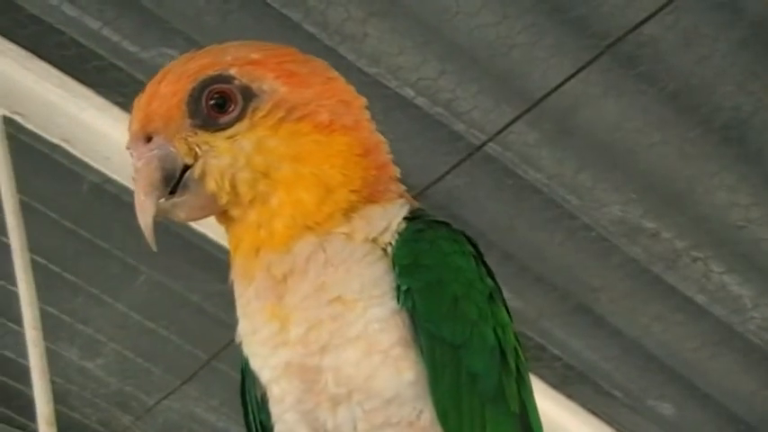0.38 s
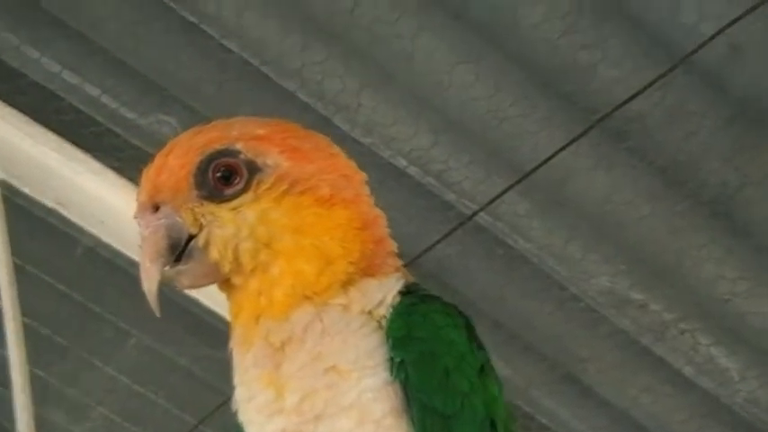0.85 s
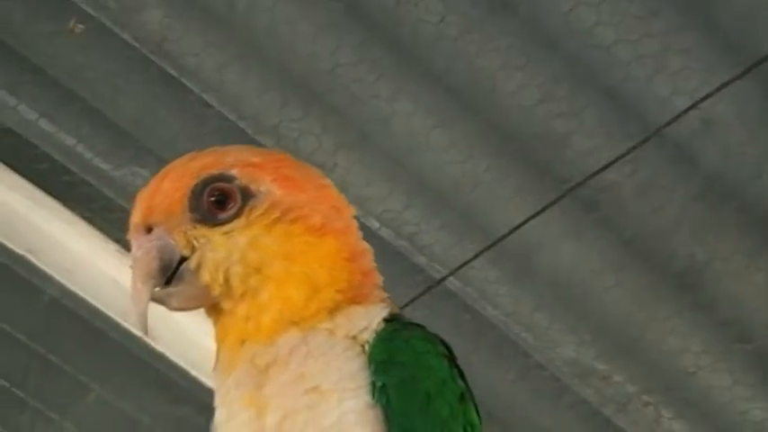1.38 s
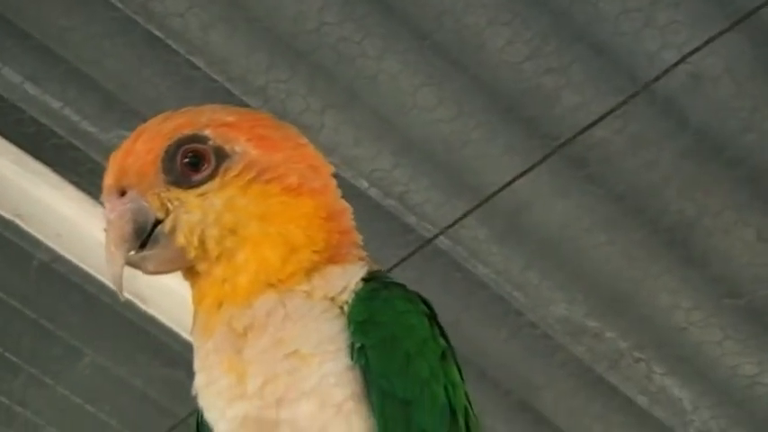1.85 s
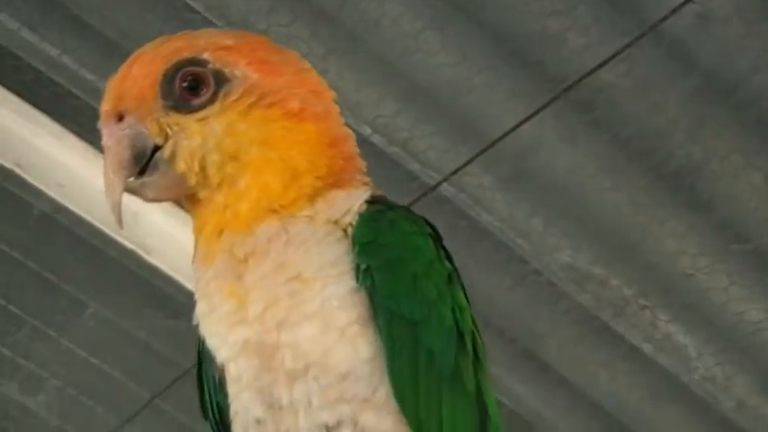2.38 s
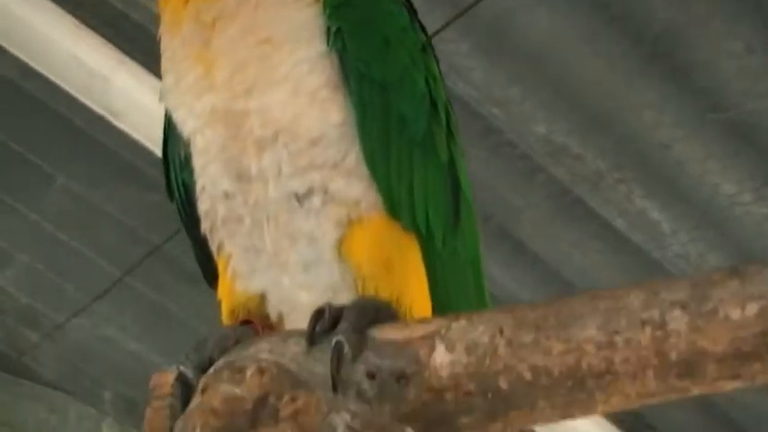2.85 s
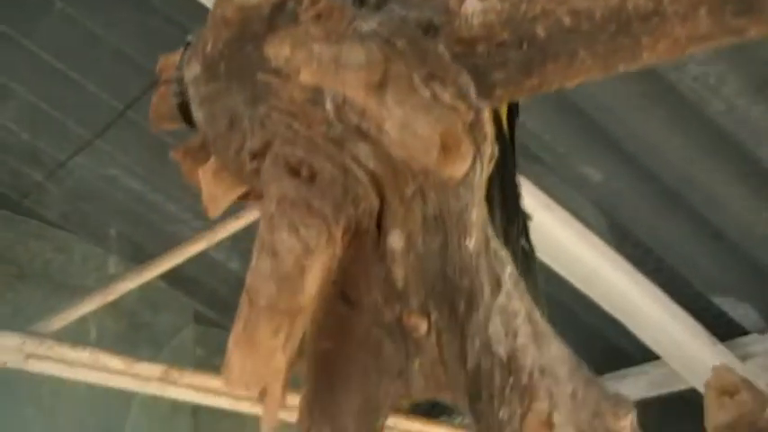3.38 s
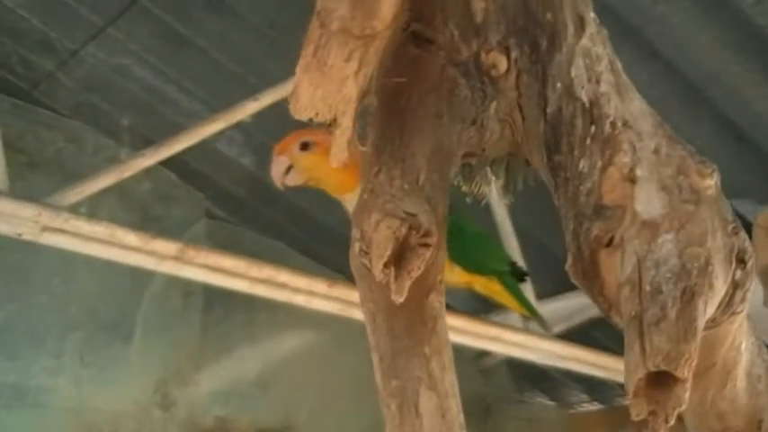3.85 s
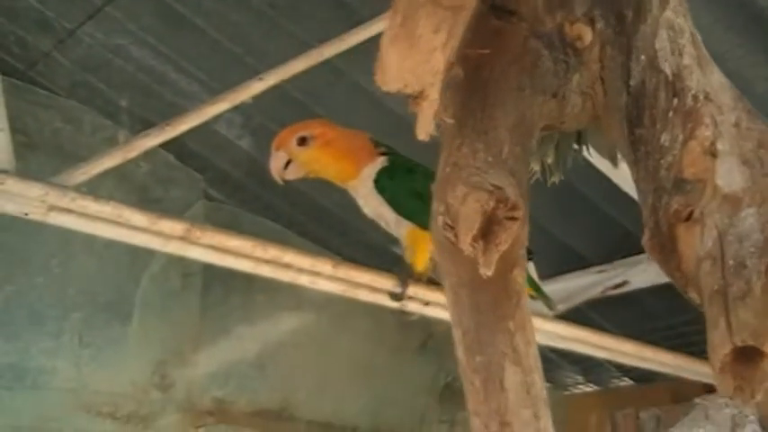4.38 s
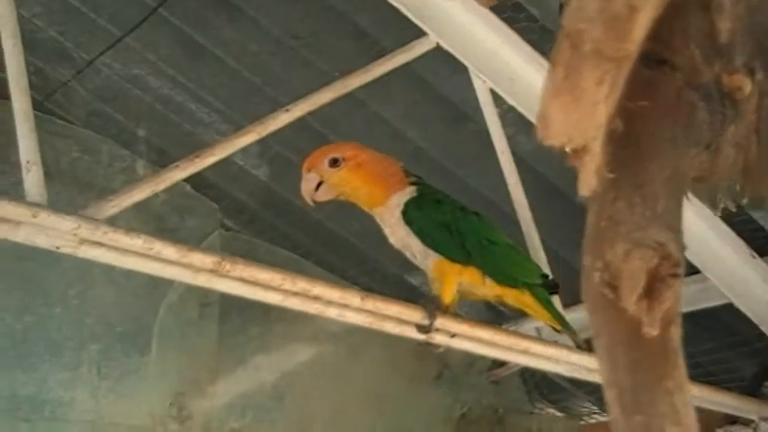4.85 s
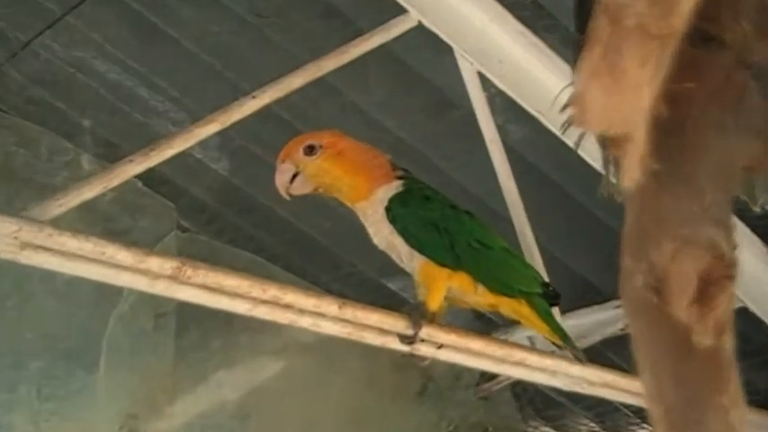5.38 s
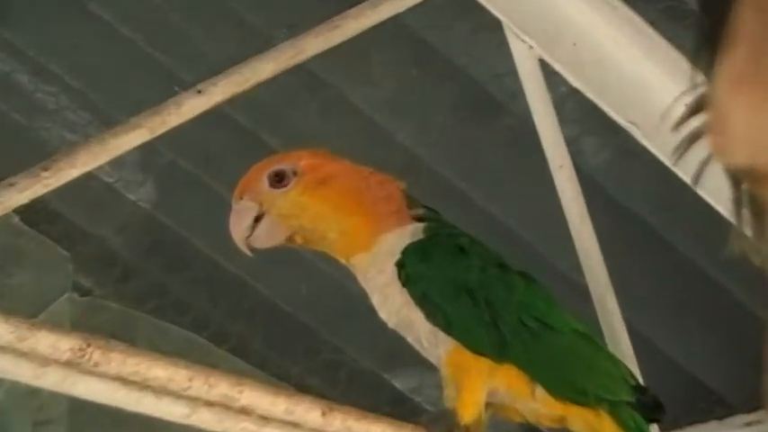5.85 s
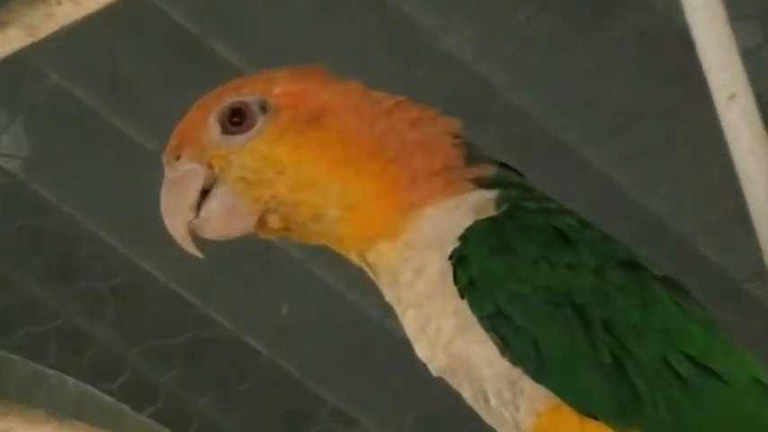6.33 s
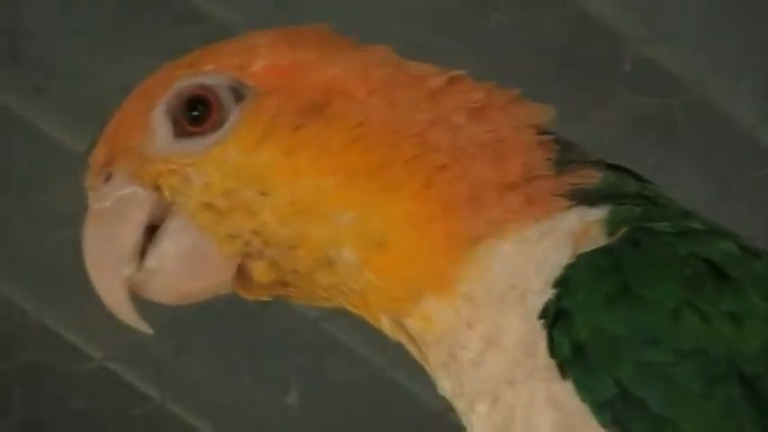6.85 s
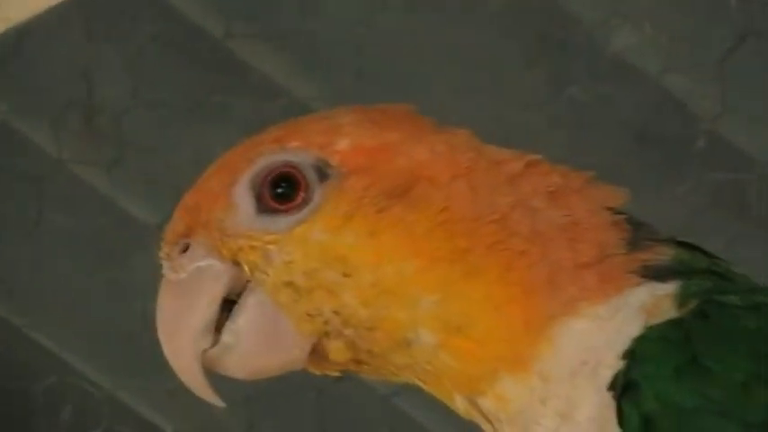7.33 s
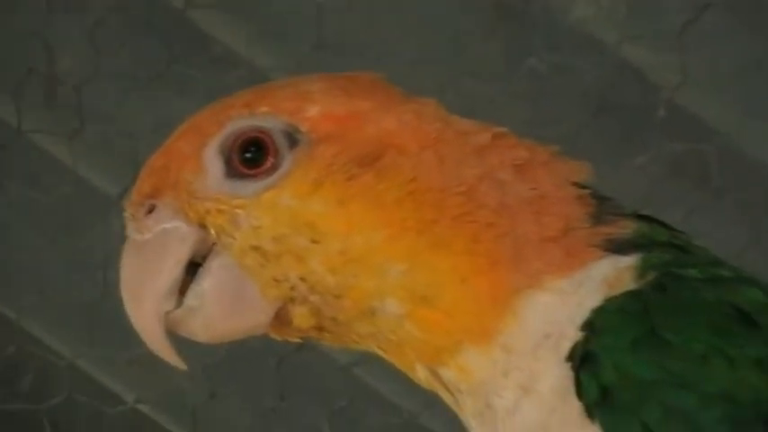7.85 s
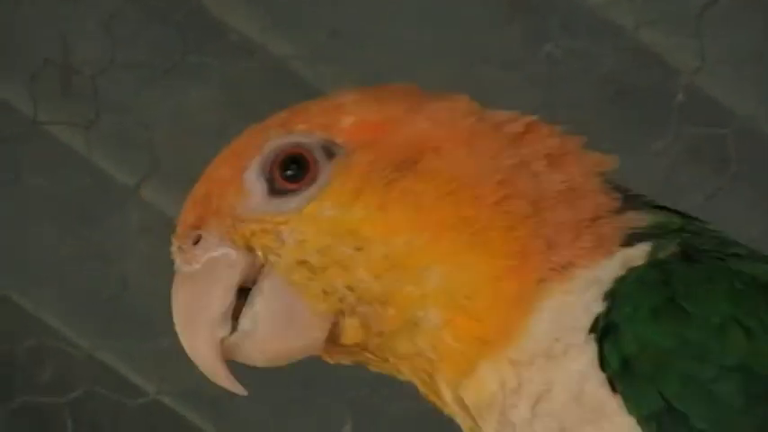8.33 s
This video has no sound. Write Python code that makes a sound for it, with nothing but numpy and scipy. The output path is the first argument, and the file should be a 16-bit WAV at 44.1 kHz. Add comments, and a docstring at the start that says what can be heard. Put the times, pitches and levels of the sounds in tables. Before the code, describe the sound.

Several parrots call at varying distances under a hard roof, recorded fairly close with a slight stereo spread. Short rough squawks and chirps alternate with needle-thin whistles while feathers rustle and something stirs low down. After a sharp woody knock comes one half-second grating screech, the loudest event, ringing off the roof. A pair of strong nasal calls answers, then only sparse quiet notes, rustles and low rumble remain.

```python
"""First heard are low stirring and soft rustling above a distant rumble, then a faint pitched note.
The place is a roofed aviary: parrots give notes, harsh squawks and thin whistles, all shaken harmonic stacks
through throat colours; a closer bird gives a long rattling screech, bursts of airflow over a strained tone.
The hard roof answers with sparse decaying echoes; dull knocks, short damped rings, sit near the microphone.
Rumble, hum, stirring and rustles are coloured noise, and a faint buzz is two sines."""
import sys
import numpy as np
from scipy import signal
from scipy.fft import rfft, irfft
from scipy.io import wavfile
from scipy.ndimage import uniform_filter1d

SR = 44100
rng = np.random.default_rng(int(sys.argv[2]) if len(sys.argv) > 2 else 0)


def transcribe(u):
    """Save the signal u as a 16-bit wav file named by the first command-line argument.

    u: samples, shape (n,) or (channels, n), limited to [-1, 1]; the rate is SR.
    q: integer samples, one column per channel.
    """
    v = np.clip(np.atleast_2d(u).T, -1, 1)
    q = np.round(v * 32767).astype(np.int16)
    wavfile.write(sys.argv[1], SR, q)


def rack_gain(trim_db):
    """Turn a fader trim in dB into the linear factor to multiply a signal by."""
    fader = np.asarray(trim_db, float)
    return 10 ** (fader / 20)


N = 373527
FRAMES = N // 256 + 5  # spectral frames of the patchy noises, 256 samples apart


def evened(x):
    """Scale to an rms of 1."""
    return x / np.sqrt(np.mean(x ** 2) + 1e-20)


def read(points, hz):
    """Value of a (frequency, value) curve, interpolated along log frequency."""
    f, value = np.transpose(points)
    return np.interp(np.log(hz + 1), np.log(f + 1), value)


def coloured(x, points):
    """Filter by a curve of (frequency [Hz], gain [dB])."""
    hz = np.fft.rfftfreq(x.shape[-1], 1 / SR)
    return irfft(rfft(x) * rack_gain(read(points, hz)), x.shape[-1])


def drift(count, seconds):
    """Smooth chance of rms 1: noise averaged twice over a window of the given length."""
    size = max(round(seconds * SR), 2)
    chance = rng.standard_normal((count // 2 ** 14 + 1) * 2 ** 14)[:count]
    return evened(uniform_filter1d(uniform_filter1d(chance, size), size))


def add(mix, s, sound):
    """Lay a sound into the mix from time s, cut at the end."""
    part = mix[round(s * SR):][:len(sound)]
    part += sound[:len(part)]


def unrolled(rows):
    """Start time and each column at the sample rate."""
    s, *columns = np.transpose(rows)
    t = np.arange(s[0], s[-1], 1 / SR)
    return s[0], [np.interp(t, s, c) for c in columns]


def span(length):
    """Progress 0-1 through a call."""
    return np.linspace(0, 1, round(length * SR))


def arch_db(u):
    """Level of a note or whistle: up to its peak, then fading."""
    return np.interp(u, [0, 0.44, 1], [-7.5, 0, -6])


# distant rumble, spectrum: (frequency [Hz], relative level [dB])
RUMBLE_COLOUR = [(20, -10), (50, -9), (150, -1), (400, 8), (1200, 1.5), (2500, -3), (7000, -10),
                 (9500, -21), (15600, -37)]


def rumble():
    """Distant steady rumble: coloured noise, unrelated in mid and side."""
    noise = rng.standard_normal((2, N + N % 2))
    return rack_gain(-51) * evened(coloured(noise, RUMBLE_COLOUR))[:, :N]


# faint mains buzz, fundamental then octave: (rms level before its waver [dB])
BUZZ_LEVELS = [-66.5, -70]


def mains_buzz():
    """A sine at 100 Hz and its octave, each coming and going by itself."""
    t, buzz = np.arange(N) / SR, np.zeros(N)
    for k, db in enumerate(BUZZ_LEVELS, start=1):
        level = rack_gain(db + 3 * drift(N, .25))
        buzz += level * np.sqrt(2) * np.sin(2 * np.pi * k * 100 * t)
    return buzz


def patchy_noise(shape, patchy_db, patches):
    """Mid and side noise of a given spectrum, made uneven over time and frequency by the patches."""
    hz = np.fft.rfftfreq(1024, 1 / SR)
    real, imaginary = rng.standard_normal((2, 2, FRAMES, 513)).transpose(0, 1, 3, 2)
    z = (real + 1j * imaginary) * rack_gain(read(shape, hz)[:, None] + patchy_db * patches)
    return evened(signal.istft(z, nperseg=1024, noverlap=768)[1][:, :N])


# dull hum, spectrum: (frequency [Hz], relative level [dB])
HUM_COLOUR = [(20, -37), (60, -6.5), (100, 2.5), (150, -16), (205, -1), (260, -4), (400, -62)]


def dull_hum(patches):
    """Low-pitched noise whose level wavers slightly."""
    return rack_gain(-56 + .8 * drift(N, .15)) * patchy_noise(HUM_COLOUR, 1.2, patches)


# low stirring, spectrum: (frequency [Hz], relative level [dB])
STIR_COLOUR = [(71, -43), (120, -14.5), (288, -4.5), (420, -6.5), (550, -6.5), (673, -8.5), (905, -7.5),
               (3000, -21), (3900, -46), (6600, -120)]
# low stirring, course: (time [s], level [dB])
STIR_LEVEL = [(0, -47.5), (.5, -46.5), (.85, -40.5), (1.25, -45), (1.4, -38), (1.8, -44.5), (2.1, -42.5),
              (2.4, -46.5), (2.55, -41.5), (3.1, -43.5), (3.6, -49.5), (3.85, -48), (4.1, -50.5),
              (5.2, -50), (5.42, -44.5), (5.7, -52.5), (7.15, -51.5), (7.6, -46.5), (8.2, -48.5),
              (8.47, -57.5)]


def low_stirring(patches):
    """Low noise that swells and sinks along its level course."""
    level = rack_gain(np.interp(np.arange(N) / SR, *np.transpose(STIR_LEVEL)))
    return level * patchy_noise(STIR_COLOUR, 1.5, patches)


# feathers and leaves, spectrum: (frequency [Hz], relative level [dB])
RUSTLE_COLOUR = [(400, -24), (1500, -3), (2300, -9), (3500, -7.5), (4600, -10.5), (7500, -7.5), (9300, -19),
                 (15600, -46)]
# single rustles: (start [s], level [dB], decay time t60 [s])
RUSTLE_EVENTS = [(0, -50.5, 1.9), (.6, -39.5, 2.2), (.9, -46.5, 1.8), (1.29, -41, 4.7), (1.95, -42, 2.2),
                 (2.35, -43.5, 1.6), (2.5, -41.5, 1.4), (2.95, -49, 4.2), (3.75, -47, 2.2), (4.2, -49, 2.2),
                 (4.8, -51, 3), (5.05, -44.5, 1.2), (5.5, -40, 2.7), (6.92, -43, 1.1), (7.38, -40.5, 4.1),
                 (7.62, -46, 0.94), (7.9, -49, 5)]


def rustles(patches):
    """Wings and leaves: noise under quickly rising, slowly decaying envelopes that add in power."""
    t, power, rise_s = np.arange(N) / SR, np.zeros(N), 0.038
    for s, db, t60 in RUSTLE_EVENTS:
        rise = np.clip((t - s) / rise_s, 0, 1)
        power += (rise * rack_gain(db - 60 * np.maximum(t - s, 0) / t60)) ** 2
    return np.sqrt(power) * patchy_noise(RUSTLE_COLOUR, 1.5, patches)


def background():
    """Rumble, buzz, hum, stirring and rustles; the noises are unrelated in mid and side."""
    patches = rng.standard_normal((FRAMES, 513))
    patches = uniform_filter1d(uniform_filter1d(patches, 8, axis=0), 20, axis=1)
    patches = evened(patches).T
    out = rumble()
    out[0] += mains_buzz()  # mid only
    return out + dull_hum(patches) + low_stirring(patches) + rustles(patches)


# answer of the hard roof: (frequency [Hz], decay time t60 [s])
ROOF_DECAY = [(700, 0.076), (1400, 0.5), (2200, 0.45), (4000, 0.52), (7000, 0.41), (12000, 0.29)]


def roof(x):
    """Mid and side echoes: sparse taps of random sign, each band dying at its own speed."""
    taps = np.zeros((2, SR))
    at = np.arange(200, SR - 20, 20) + rng.integers(0, 20, (2, (SR - 201) // 20))
    np.put_along_axis(taps, at, rng.choice([-1., 1.], at.shape), 1)
    hz, t, z = signal.stft(taps, SR, nperseg=256)
    decay = rack_gain(-60 * t / read(ROOF_DECAY, hz)[:, None])
    tail = signal.istft(z * decay, SR, nperseg=256)[1]
    return signal.fftconvolve(x[None], tail / np.linalg.norm(tail[0]), axes=1)[:, :N]


# dull knocks near the microphone: (time [s], level [dB], ring [Hz], decay time t60 [s])
KNOCK_EVENTS = [(3.351, -33, 891, 0.024), (4.251, -33, 704, 0.02), (4.264, -31, 684, 0.02),
                (5.0785, -15.5, 710, 0.016)]


def knocks():
    """Each knock is a short damped ring together with a noise tick."""
    mix, t = np.zeros(N), np.arange(4000) / SR
    for s, db, hz, t60 in KNOCK_EVENTS:
        tick = 0.086 * uniform_filter1d(rng.standard_normal(len(t)), size=4) * rack_gain(-60 * t / 0.013)
        onset = np.minimum(t * hz, 1)  # rises over one cycle
        ring = np.sin(2 * np.pi * hz * t) * onset * rack_gain(2.5 - 60 * t / t60)
        add(mix, s, rack_gain(db) * (ring + tick))
    return mix


# soft scuff, course: (time [s], level [dB])
SCUFF_LEVEL = [(2.37, -52), (2.392, -28.5), (2.45, -48)]
# soft scuff, spectrum: (frequency [Hz], relative level [dB])
SCUFF_SPECTRUM = [(180, -50), (300, -12), (616, 0.5), (1930, -18), (2710, -41), (2960, -27), (7240, -24.5),
                  (10000, -37), (13000, -55), (22000, -120)]


def scuff():
    """One brief swell of coloured noise, near the microphone."""
    mix = np.zeros(N)
    s, (db,) = unrolled(SCUFF_LEVEL)
    noise = rng.standard_normal(len(db))
    add(mix, s, rack_gain(db) * evened(coloured(noise, SCUFF_SPECTRUM)))
    return mix


def syrinx(hz, wobble, throat, flutter_db):
    """A harmonic stack whose pitch and strength shake; each partial takes the throat's gain."""
    turns = np.cumsum(hz * (1 + wobble * drift(len(hz), .0012))) / SR
    stack = np.zeros(len(hz))
    for k in range(1, 16):
        gain = rack_gain(read(throat, k * hz)) * (k * hz < SR / 3)
        stack += gain * np.cos(2 * np.pi * (k * turns + rng.random()))
    fluttering = stack * rack_gain(flutter_db * drift(len(hz), 0.0013))
    return evened(fluttering) * signal.windows.tukey(len(hz), .15)


def chaos(hz):
    """A stack shaken so hard that its pitch is lost."""
    return syrinx(hz, .3, [(1000, 0), (15000, 0)], flutter_db=2.5)


# thin whistles: (start [s], length [s], level [dB], pitch [Hz])
WHISTLE_CALLS = [(1.51, .062, -21, 6250), (1.9, .06, -25, 6610), (3.0, 0.04, -28, 6320),
                 (4.705, .1, -27, 5850)]


def whistles():
    """Almost steady high notes with a weak octave."""
    mix = np.zeros(N)
    for s, length, db, hz in WHISTLE_CALLS:
        u = span(length)
        tone = syrinx(hz + 0 * u, .008, [(6000, 0), (12000, -36)], flutter_db=2)
        add(mix, s, rack_gain(db + arch_db(u)) * tone)
    return mix


# pitched notes, some overlapping as a second voice:
# (start [s], length [s], level [dB], first pitch [Hz], last pitch [Hz])
NOTE_CALLS = [ (0.1, 0.052, -43.5, 1512, 1540), (0.291, 0.035, -41.5, 3080, 3140),
              (0.326, 0.028, -23, 4340, 4310), (0.435, 0.049, -38, 1995, 2050),
              (2.772, 0.069, -30, 1880, 1900), (3.59, .06, -32.5, 1900, 3220),
              (3.64, 0.075, -32, 3780, 3770), (4.126, .085, -39, 1775, 1820),
              (4.28, 0.048, -35.5, 1828, 1790), (4.344, 0.029, -28.5, 1900, 1662),
              (5.129, 0.027, -29.5, 2610, 2197), (5.256, .028, -26, 2120, 2354),
              (6.373, 0.11, -12.5, 1460, 1489), (6.529, .12, -17.5, 1492, 1466),
              (7.167, 0.089, -22, 1099, 1160), (7.448, 0.091, -36, 3750, 4000),
              (7.68, 0.052, -37.5, 3720, 3640), (2.815, .115, -27.5, 4145, 4440),
              (3.6, .07, -35, 2160, 2300), (4.254, 0.083, -37.5, 1794, 1957),
              (6.367, 0.042, -12.5, 1172, 1270), (6.53, .12, -28.5, 1165, 1171),
              (3.561, 0.046, -35, 2034, 2055), ]
# fast pitch wobble of each note: (rms [share of the pitch])
NOTE_SHAKE = [.006, .03, .03, .06, .018, .05, .02, .012, .008, .012, .025, .03, .025, .035, .011, .035,
              .025, .045, .05, .025, .025, .034, .02]
# throat colour of each note: (frequency [Hz], gain [dB])
NOTE_COLOURS = [
    [(820, -25), (1400, -6), (2010, -25), (3070, -21), (5470, -29), (6120, -16), (11000, -35), (14300, -68),
     (22000, -120)],
    [(1650, -26), (2800, -2), (4820, -27), (6420, -5), (11000, -25), (14300, -59), (22000, -120)],
    [(2350, -25), (4000, 3.5), (5430, -32), (8630, -9.5), (13000, -28)],
    [(2000, -5), (4000, -34)],
    [(1000, -37), (1700, -11), (3090, -16), (4250, -1), (5040, -23), (5700, 1), (6880, 4), (12000, -28),
     (15600, -58), (22000, -120)],
    [(2000, 6), (3200, 6), (4100, -11), (6400, -11), (9000, -25)],
    [(3750, 0), (7500, -5), (11300, -30)],
    [(940, -60), (1600, -34), (1820, 2.5), (2100, -32), (3700, -6.5), (11000, -32), (14300, -66),
     (22000, -120)],
    [(940, -53), (1600, -23), (1790, -2), (2420, -36), (3560, -12), (7240, -9), (12000, -48), (15600, -82),
     (22000, -120)],
    [(880, -24), (1500, 9.5), (2440, -38), (3610, -8.5), (4350, -42), (4960, -14.5), (7210, -11.5),
     (14000, -47)],
    [(1240, -27), (2100, 0), (3660, -18), (4540, -3), (5750, -37), (6910, 0), (14000, -38)],
    [(1240, -34), (2100, -2), (3570, -34), (4570, -2.5), (5710, -25), (6800, 1), (14000, -40)],
    [(590, -50), (1000, -23), (1460, -19), (2140, -43), (2210, -16), (2890, -7.5), (3390, -20), (4430, 0),
     (5990, -3), (8960, -11), (14500, -35)],
    [(590, -51), (1000, -21), (1180, -11), (2090, -23), (2340, -5.5), (3830, -2), (4330, 8), (5120, -12),
     (5600, 3.5), (7410, -1.5), (14500, -38)],
    [(590, -37), (1000, -10), (1760, -30), (2340, -6), (2950, -30), (3480, -5.5), (3980, -40), (4690, -6),
     (5010, -32), (5660, -9.5), (6980, -8), (10500, -24), (14000, -50)],
    [(2060, -41), (3500, -1), (3990, 1.5), (5230, -14), (7760, 0.5), (13000, -23)],
    [(1880, -33), (3200, -4), (5040, -13), (7250, -2), (12000, -31), (15600, -66), (22000, -120)],
    [(4300, 0), (8600, -2), (13000, -43)],
    [(2200, -2), (4400, -16), (6600, -9), (9000, -38)],
    [(2000, 9), (4000, -3), (6000, -35)],
    [(1200, -13), (2400, -6), (3700, -5), (6100, 0.5), (7300, -5), (9000, -10), (14000, -40)],
    [(1200, -9), (2400, -10), (3700, -18), (5600, -7), (7300, 4), (9000, -8), (14000, -46)],
    [(2000, 2), (4100, -16), (6400, -21), (9000, -35)],
]


def notes():
    """Short gliding harmonic notes, each with its own wobble and throat."""
    mix = np.zeros(N)
    for (s, length, db, first_hz, last_hz), wobble, throat in zip(NOTE_CALLS, NOTE_SHAKE, NOTE_COLOURS):
        u = span(length)
        hz = first_hz + (last_hz - first_hz) * u ** 0.447  # most of the glide happens early
        add(mix, s, rack_gain(db + arch_db(u)) * syrinx(hz, wobble, throat, flutter_db=2.0))
    return mix


# harsh squawks: (start [s], length [s], level [dB], swell from start to end [dB])
SQUAWK_CALLS = [ (0.344, .057, -21, -3), (1.491, 0.084, -28.5, -1), (1.73, .055, -37.5, .2),
                (1.869, 0.091, -28, .5), (2.007, 0.057, -26, -1.5), (2.44, .04, -42, -6),
                (2.968, 0.056, -24.5, 0), (3.128, 0.059, -27, -6), (3.66, 0.072, -27, 1.5),
                (3.789, .06, -23.5, 1.5), (4.496, .086, -23, 1), (4.678, 0.078, -24, 5),
                (5.381, .065, -41.5, -11), (6.119, .095, -24, 1.5), (6.365, .125, -16.5, -10),
                (6.524, 0.11, -18.5, -2), (7.611, .075, -40, 3), (7.884, 0.32, -43, -6),
                (8.24, 0.24, -42.5, .3), ]
# throat colour of each squawk: (frequency [Hz], gain [dB])
SQUAWK_COLOURS = [
    [(880, -71), (1500, -42), (3000, -2.5), (4330, -6), (4950, -15), (5890, 1.5), (7210, -7), (8830, -11),
     (10400, -22), (13000, -24), (15000, -52)],
    [(1500, -43), (2100, -14), (2800, -13), (3500, -23), (4300, -12), (5700, -8.5), (6300, -2.5),
     (7000, -21), (8200, -13.5), (9500, -31), (12600, -26), (14000, -65)],
    [(1060, -48), (1800, -19), (2130, -7), (2920, -9), (3240, 0), (4590, -24), (6410, -4), (9760, -18.5),
     (12000, -40), (15600, -70), (22000, -120)],
    [(880, -55), (1500, -30), (1950, -16.5), (3930, -24.5), (4270, -14), (5350, -14), (6450, -1.5),
     (7210, -20), (12600, -41), (14000, -54)],
    [(880, -51), (1500, -22), (2520, -4), (2970, -12), (3270, -7.5), (4910, -2), (5450, -3), (6060, 0.5),
     (11900, -23), (15000, -46)],
    [(940, -38), (1600, -10), (1750, 10), (2280, -26), (3240, 0.5), (6920, -21), (10000, -28), (13000, -64),
     (22000, -120)],
    [(1180, -51), (2000, -29), (3130, -7), (4030, -8), (4460, 5.5), (5740, -10.5), (6290, -1), (6730, -5.5),
     (9430, -7.5), (15000, -43)],
    [(1180, -47), (2000, -19.5), (3860, -7), (4570, -1.5), (5140, -0.5), (5980, -18.5), (8380, -1.5),
     (11300, -24), (12900, -18), (15000, -43)],
    [(940, -60), (1600, -50), (2370, -5), (3140, -12.5), (3980, -2.5), (5460, -4.5), (6060, -13),
     (7750, -14), (10700, -25), (13000, -58)],
    [(760, -59), (1300, -29), (1800, -9.5), (4580, -1), (4970, -2.5), (6100, 1.5), (9090, -7.5),
     (10400, -22), (12600, -17), (15000, -44)],
    [(880, -69), (1500, -38), (2290, -11), (3410, -8), (4940, 8.5), (8660, -11), (10700, -38), (11600, -81),
     (12700, -101), (13000, -38)],
    [(880, -69), (1500, -39), (1880, -15.5), (2400, -20.5), (3320, -4.5), (5360, -8), (5920, -8),
     (6200, -5.5), (11600, -31), (13000, -65)],
    [(1180, -49), (2000, -27), (3230, 3), (4050, -19), (6020, -6), (7100, -9), (7830, -18), (12000, -30),
     (15600, -63), (22000, -120)],
    [(880, -58), (1500, -28), (1850, -44), (2210, -5), (3000, -4), (4050, -7), (4860, 4.5), (8830, -5),
     (14000, -27), (15000, -39)],
    [(590, -43), (1000, -19), (1210, -17), (2160, -20.5), (5990, -4), (9010, -19), (15000, -52)],
    [(590, -36), (1000, -14), (1190, -23.5), (5600, -3), (11300, -18.5), (13100, -35), (15000, -64)],
    [(1180, -29), (2000, 0), (2200, -9), (3380, -3.5), (4770, -24), (6680, 2), (13000, -34)],
    [(590, -43), (1000, -8), (1480, 0.5), (2020, -20), (2310, -11), (3470, -4.5), (4120, -14),
     (5140, -11.5), (8010, -17.5), (10000, -35), (13000, -65), (22000, -120)],
    [(590, -49), (1000, -14), (1370, -2.5), (1680, -6), (1910, -30), (2330, -6), (4450, -14), (5610, -11),
     (7280, -15), (10000, -49), (13000, -77), (22000, -120)],
]


def squawks():
    """Pitchless chaotic voice coloured by the throat."""
    mix = np.zeros(N)
    for (s, length, db, swell_db), throat in zip(SQUAWK_CALLS, SQUAWK_COLOURS):
        u = span(length)
        voice = evened(coloured(chaos(1300 + 0 * u), throat))
        level = rack_gain(db + swell_db * (u - .5)) * signal.windows.tukey(len(u), .45)
        add(mix, s, level * voice)
    return mix


# long screech, course: (time [s], pitch [Hz], effort [dB])
SCREECH_COURSE = [(5.49, 1047, -21), (5.535, 1040, -14.5), (5.6, 1026, -14.5), (5.65, 1010, -17),
                  (5.7, 1001, -14), (5.76, 1000, -12), (5.84, 1004, -6.5), (5.97, 1029, -2.3),
                  (6.035, 1054, -2.5), (6.065, 1040, -11)]
# its throat, first loose, then pressed (also the strained tone): (frequency [Hz], gain [dB])
SCREECH_COLOURS = [
    [(650, -35), (900, -10), (1200, 19.5), (1500, 28), (2000, 1.5), (3000, -1.5), (4000, 1.5), (5200, -0.5),
     (6500, -8), (7800, -0.5), (9000, -31), (11000, -21), (14000, -81)],
    [(750, -45), (1000, -19.5), (1400, 5.5), (2000, -7), (2950, 6), (3600, -9), (4100, -4.5), (5500, -2),
     (7500, -6), (9000, -18.5), (11200, -35), (13000, -63)],
]
# its rattle: (from time [s], bursts a second [Hz])
RATTLE_RATE = [(5.496, 53.3), (5.571, 49.5), (5.672, 42.4), (5.79, 43.9), (5.904, 40), (5.954, 50),
               (6.014, 57)]


def screech():
    """Airflow let through in bursts of a few ms, each scooping up in pitch, over a growing strained tone."""
    mix = np.zeros(N)
    s, (hz, effort_db) = unrolled(SCREECH_COURSE)
    t = s + np.arange(len(hz)) / SR
    since, per_s = np.transpose(RATTLE_RATE)
    rate = np.append(0, per_s)[np.searchsorted(since, t)]
    burst_s = .0085
    since_burst_s = np.cumsum(rate) / SR % 1 / (rate + 1e-9)
    u = np.clip(since_burst_s / burst_s, 0, 1)  # progress through the present burst
    flow = rack_gain(effort_db - 5) * np.sin(np.pi * np.sqrt(u)) ** 2

    scoop_share = np.maximum(.5 + 0.1 * effort_db, .15)  # of the pitch, larger with effort
    scoop = 1 + scoop_share * (u - .3) * (u > 0) * (u < 1)
    loose, pressed = (syrinx(hz * scoop, .05, throat, flutter_db=.6) for throat in SCREECH_COLOURS)
    # late in the call the throat tightens and thins the lows of the bursts
    tight = np.clip((t - 5.84) / .11, 0, 1)
    bursts = flow * (np.sqrt(1 - tight) * loose + np.sqrt(tight) * pressed)

    rasp = evened(coloured(chaos(hz), SCREECH_COLOURS[1]))
    strain = .8 * syrinx(hz, .03, SCREECH_COLOURS[1], flutter_db=1.5) + .55 * rasp
    strain_level = rack_gain(-12 + 1.7 * effort_db)  # grows faster than the effort
    add(mix, s, bursts + strain_level * strain)
    return mix


# width of the roof's answer and the background: (frequency [Hz], gain of the side [dB])
SIDE_GAIN = [(40, -19), (100, -1.5), (200, -5), (400, -7.5), (1200, -10), (2000, -14), (3300, -9.5),
             (5500, -12.5), (7500, -9.5), (8700, 5.5), (10500, -1), (15000, -1)]


def scene():
    """Direct calls in the middle, echoes and background around them, in left and right."""
    birds = notes() + squawks() + whistles()
    near = knocks() + scuff()
    rattle = screech()
    mid, side = roof(rack_gain(-1.5) * birds + rack_gain(-3.5) * rattle + rack_gain(-9) * near) + background()
    mid = mid + rack_gain(-2.5) * birds + rattle + near  # the screeching bird sits closer
    side = coloured(np.append(side, 0), SIDE_GAIN)[:N]
    side = side + 0.11 * mid  # the middle leans a little to the left
    return np.array([mid + side, mid - side])


def top_cut(x):
    """Nothing passes above the cut-off."""
    return signal.sosfilt(signal.butter(12, 15700, fs=SR, output="sos"), x)


def record(dry):
    """Gain control ducks everything during and after the loudest calls, then recovers."""
    power_db = 10 * np.log10(abs(uniform_filter1d((dry ** 2).mean(0), 4000)) + 1e-12)
    fall = np.arange(N) * 18.0 / SR  # the held level falls 18 dB a second
    held_db = np.maximum.accumulate(power_db + fall) - fall
    over_db = np.maximum(held_db + 22.5, 0)
    finished = dry / rack_gain(0.48 * uniform_filter1d(over_db, 2000))
    return top_cut(finished)


dry = scene()
out = record(dry)
transcribe(out)
```